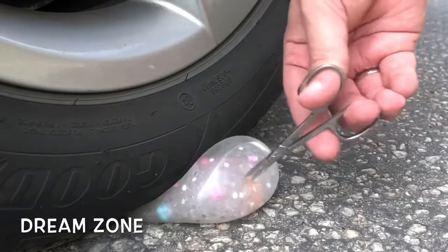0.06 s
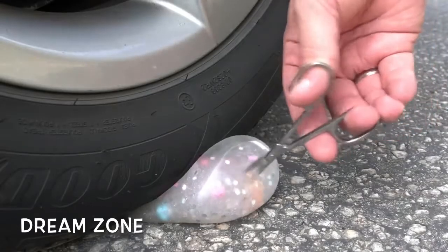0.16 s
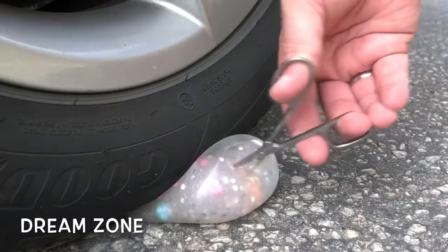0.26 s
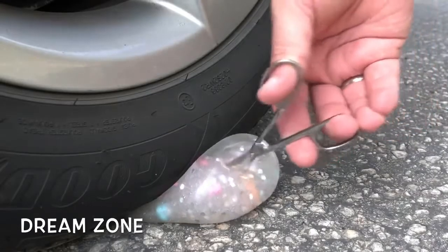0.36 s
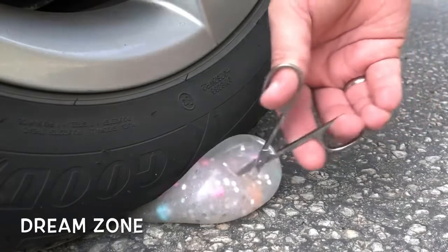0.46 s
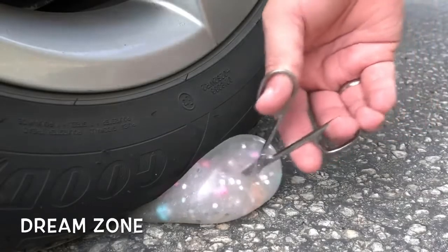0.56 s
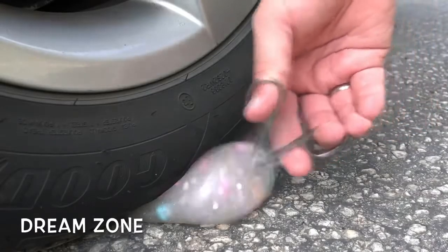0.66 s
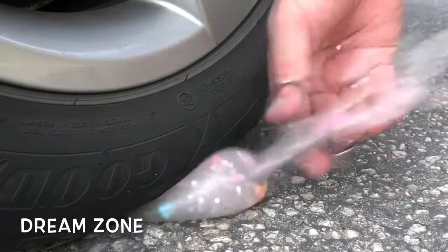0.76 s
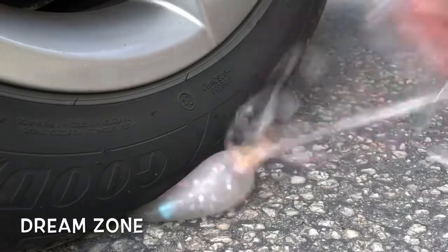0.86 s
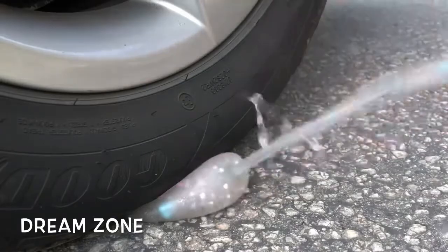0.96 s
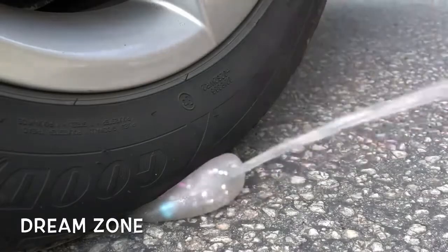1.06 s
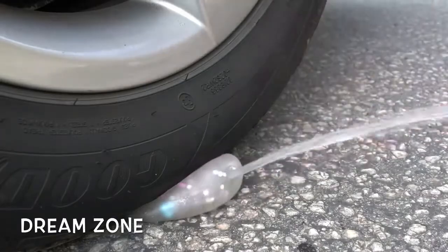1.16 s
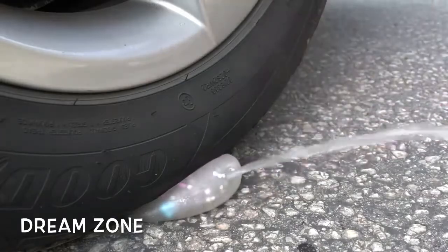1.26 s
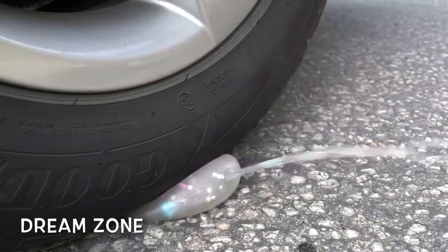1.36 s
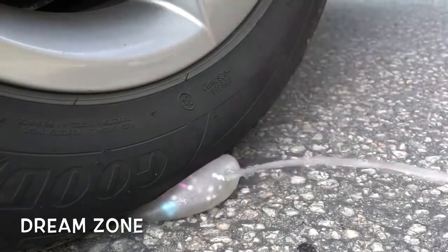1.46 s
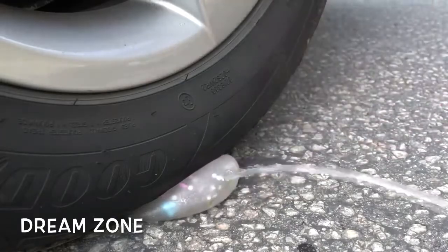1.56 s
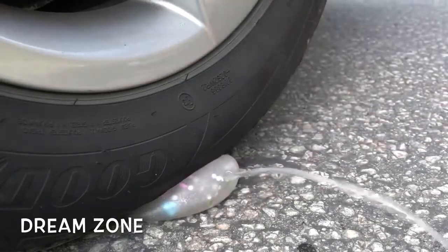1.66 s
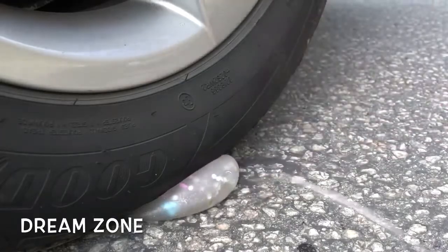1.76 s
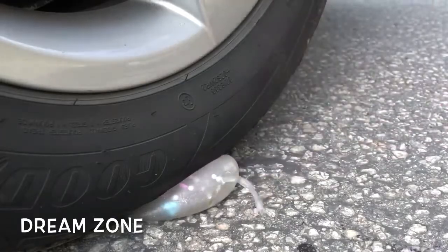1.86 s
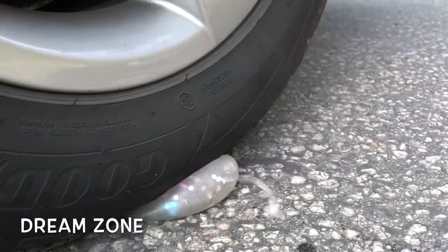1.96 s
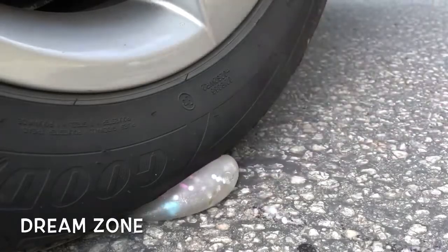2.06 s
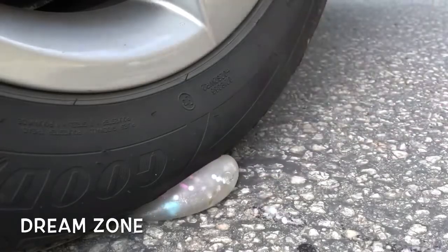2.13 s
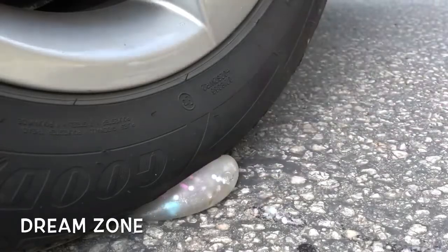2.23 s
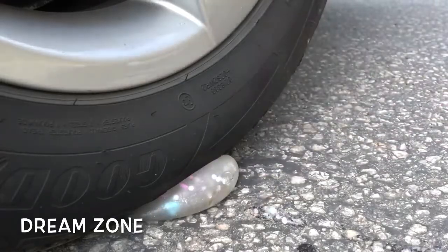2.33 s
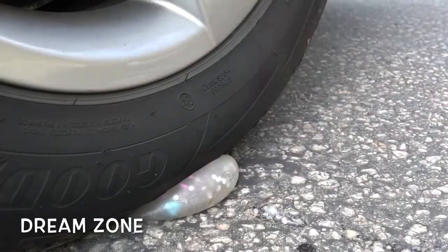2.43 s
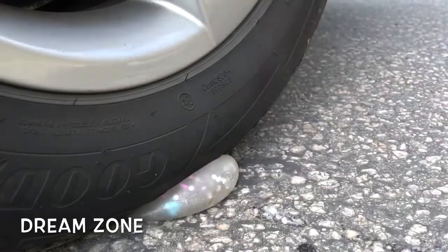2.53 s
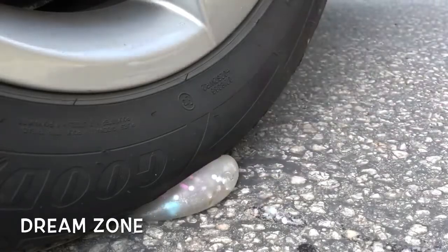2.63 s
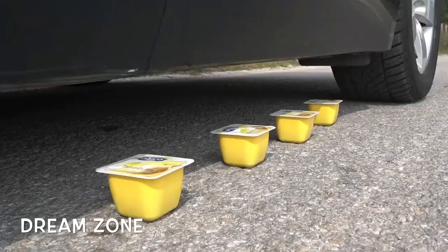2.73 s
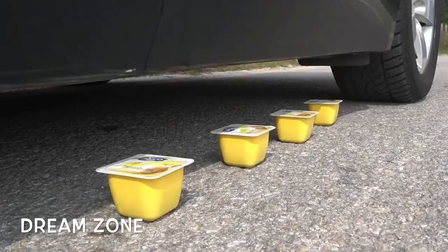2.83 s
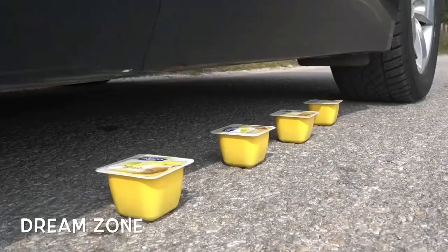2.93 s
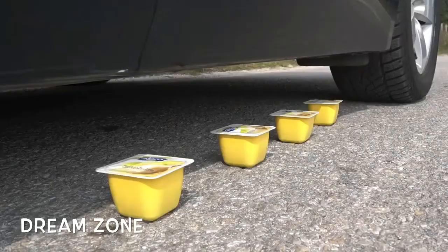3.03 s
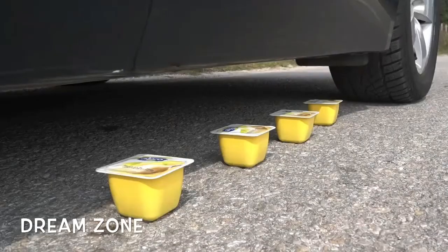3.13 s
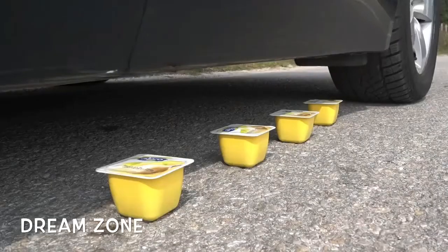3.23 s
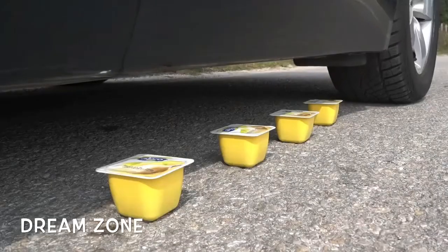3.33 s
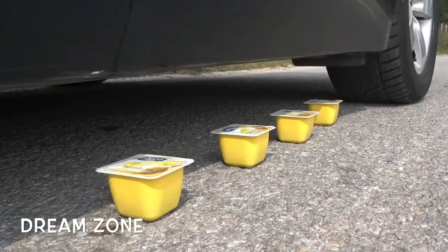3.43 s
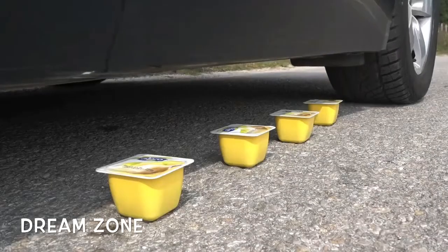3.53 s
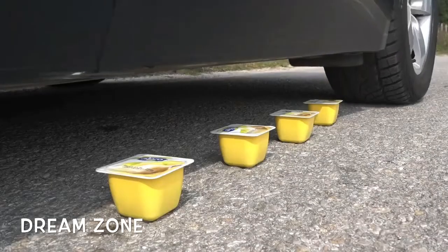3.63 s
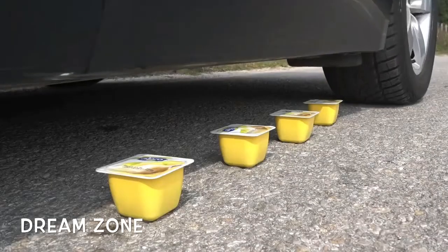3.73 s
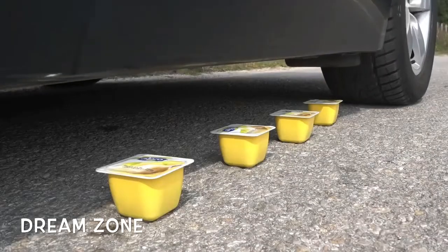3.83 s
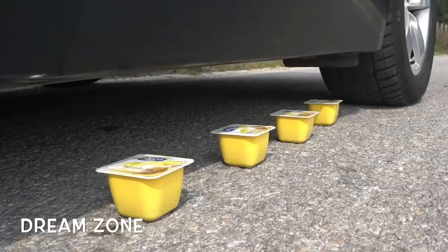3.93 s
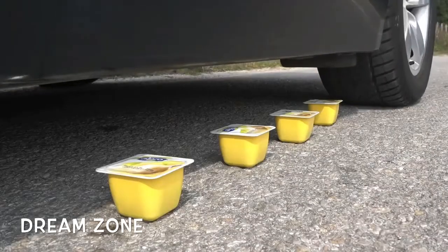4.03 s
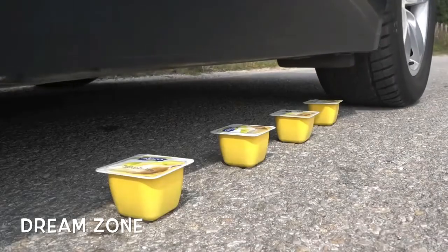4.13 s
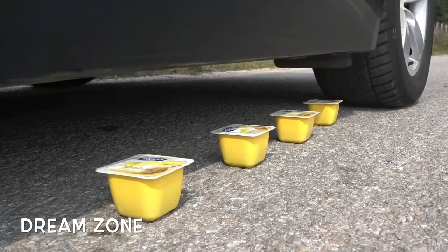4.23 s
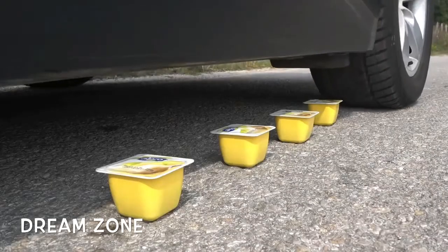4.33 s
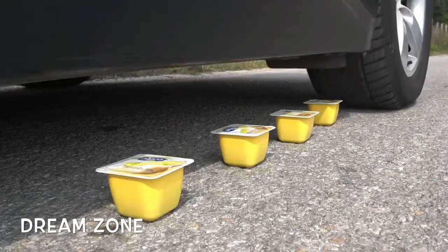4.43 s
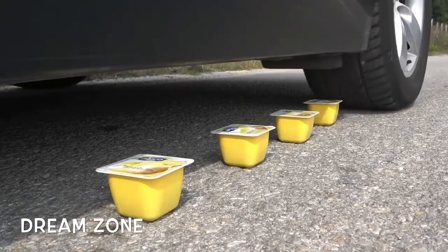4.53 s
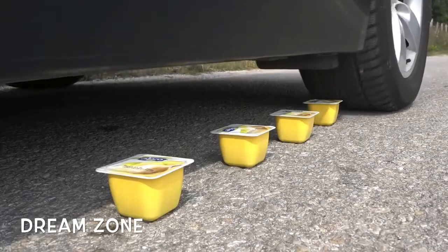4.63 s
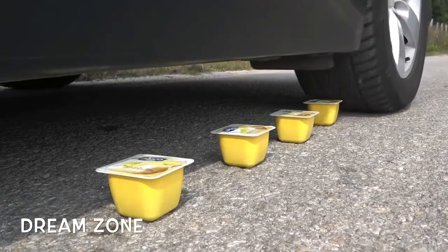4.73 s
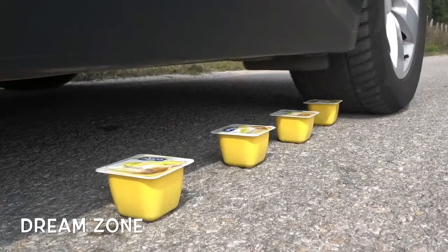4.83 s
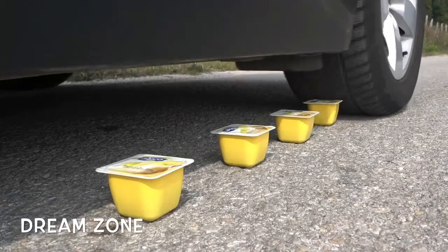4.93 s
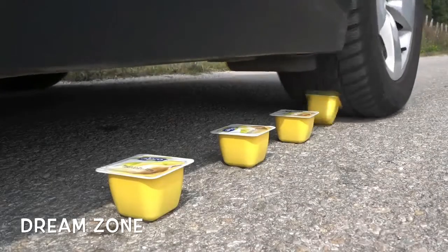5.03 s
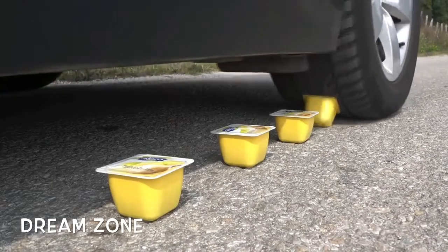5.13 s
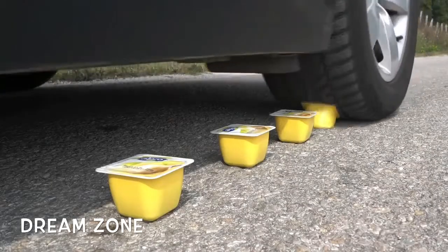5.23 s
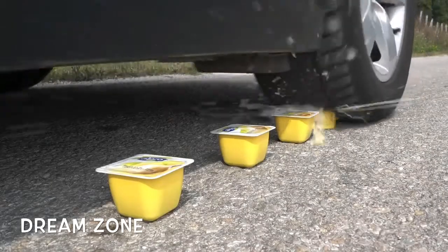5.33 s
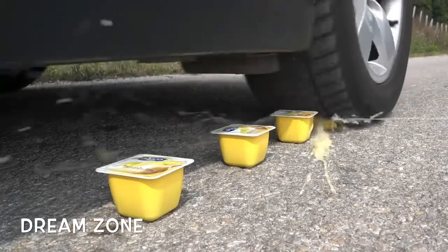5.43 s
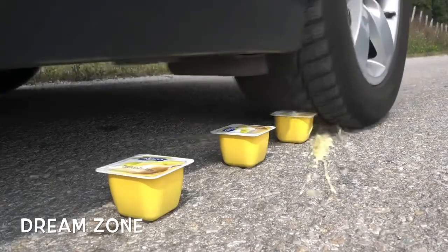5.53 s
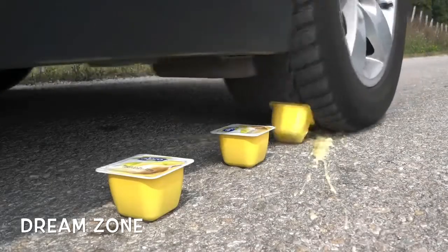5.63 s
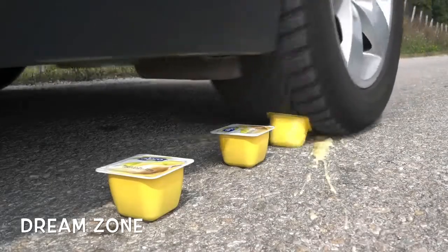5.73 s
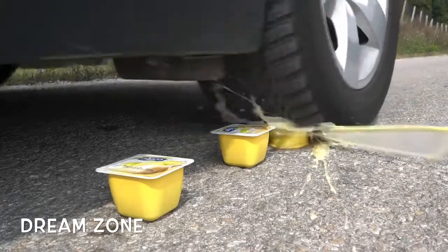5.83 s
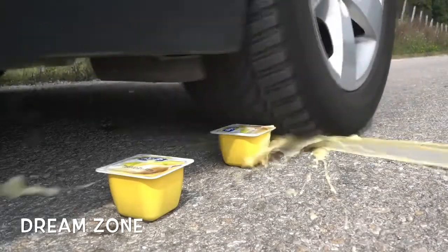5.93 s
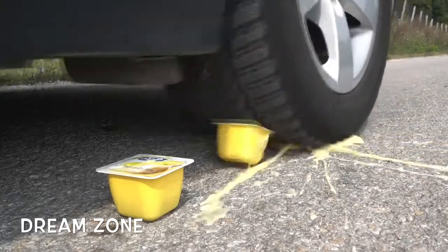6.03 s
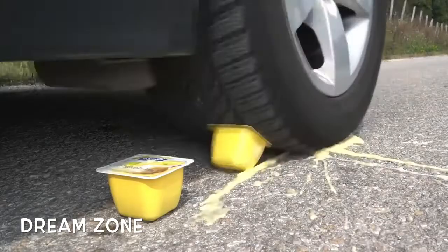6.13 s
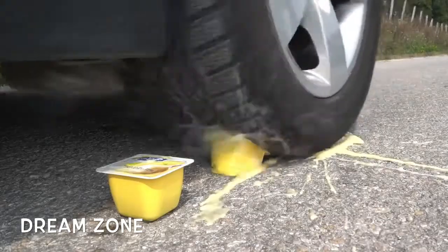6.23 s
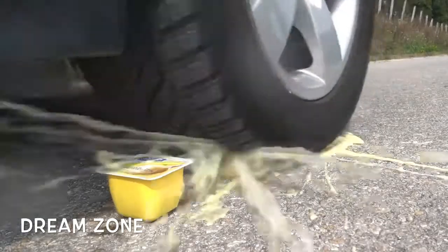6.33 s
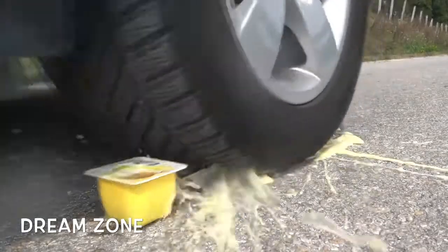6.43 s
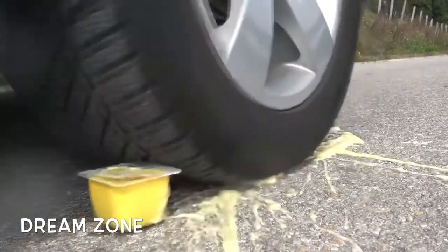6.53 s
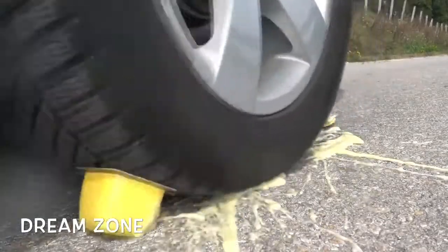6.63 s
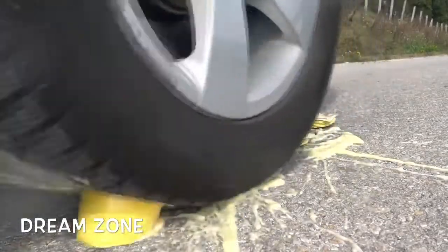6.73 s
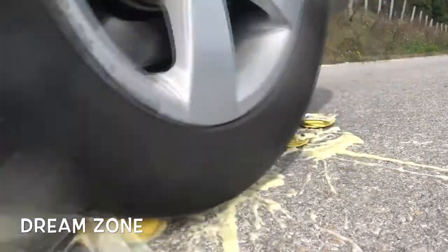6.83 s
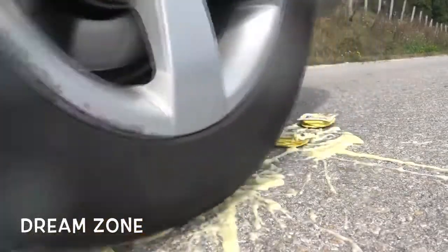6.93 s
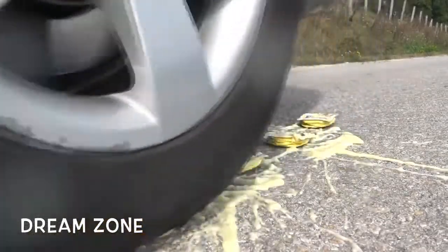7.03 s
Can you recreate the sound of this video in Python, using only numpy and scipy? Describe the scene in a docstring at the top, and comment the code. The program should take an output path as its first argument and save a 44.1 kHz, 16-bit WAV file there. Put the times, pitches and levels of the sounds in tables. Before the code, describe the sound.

A snipped water balloon bursts and spits a fading hissing jet, then a slow tyre crunches grit and crushes four sealed plastic cups with wet, snapping pops.

```python
"""You hear a wet burst and a spitting, fading hiss, then, at another spot, grit crunching and plastic
breaking: a snipped water balloon spits a jet, then a car flattens four sealed cups.
The jet, grit, squirts and open air are shaped noise with small ringing grains; spits, stones and snaps
are clicks that ring; pops are pressure pulses; gulps, groans and bumps are short tones.
An engine idles faintly at the first spot."""
import sys
import numpy as np
from scipy import signal
from scipy.fft import rfft, irfft, next_fast_len
from scipy.io import wavfile

SR = 44100
rng = np.random.default_rng(int(sys.argv[2]) if len(sys.argv) > 2 else 0)


def master(y):
    """Save y as 16-bit WAV."""
    cut = np.clip(np.atleast_2d(y).T, -1, 1)
    pcm = np.round(cut * 32767)  # scale
    wavfile.write(sys.argv[1], SR, pcm.astype(np.int16))


N = 312228   # length in samples

# Open air loudness. Each row: time in seconds, level in dB.
AIR_LEVEL = [(0, -50.5), (1.5, -52), (2.7, -52), (2.71, -54), (7.08, -43)]
# Tone of the open air at each spot. Each row: pitch in Hz, relative strength in dB per Hz.
FIRST_SPOT_TONE = [(20, -31), (50, -2.5), (92, 0.5), (220, -11.5), (320, -20.5), (720, -23), (1200, -28),
                   (2500, -28.5), (11300, -41.5)]
SECOND_SPOT_TONE = [(20, -30), (55, 3.5), (92, -5.5), (220, -3), (900, -11), (3700, -28), (11300, -34.5)]
# How alike left and right are, for near and far sounds. Each row: pitch in Hz, likeness (1 is the same).
NEAR_ALIKE = [(60, 0.95), (220, 1), (840, 0.95), (3140, 0.16), (11700, 0.2)]
FAR_ALIKE = [(60, 1), (170, 0.98), (500, 0.76), (1420, 0.26), (11700, 0.011)]

# Water jet losing pressure. Each row: time in seconds, hiss level in dB.
JET_LEVEL = [(0.607, -28), (0.68, -33), (0.79, -51), (0.83, -34.5), (1.04, -35), (1.4, -44), (1.68, -53.5),
             (1.9, -60), (2.15, -93)]
# The jet surges as the cut tears wider. Each row: start in seconds, hiss level in dB, hold in seconds.
SURGES = [(0.697, -24, 0.017), (0.756, -25.5, .003)]
# Tone of the jet. Each row: pitch in Hz, relative strength in dB per Hz.
JET_TONE = [(300, -32), (800, -13), (1300, -4.5), (2000, -8), (3600, -5.5), (6800, -5.5), (8000, -6.5),
            (11300, -6.5)]
# The cut in the skin sings. Each row: pitch in Hz, level against the hiss in dB.
NOZZLE = [(7200, -15)]
# Spits, drops and scissor ticks. Each row: start in seconds, level in dB, ring in Hz.
SPITS = [(0.508, -29.5, 950), (0.5566, -30.5, 1100), (0.6065, -8, 1290), (0.6415, -15.5, 3300),
         (0.646, -13.5, 1110), (0.6958, -11.5, 3400), (0.7044, -7, 2060), (0.7114, -14, 2670),
         (0.756, -18, 7400), (0.7633, -11, 2720), (0.806, -17, 10500), (0.849, -15, 9900),
         (0.8963, -15.5, 10500), (0.924, -23, 5070), (0.9577, -19.5, 2380), (0.987, -16, 4300),
         (1.0066, -15.5, 3900), (1.0859, -11.5, 3540), (1.0875, -19, 1410), (1.1767, -23.5, 6460),
         (1.24, -27.5, 5440), (1.3144, -24.5, 4770), (1.3457, -23.5, 5700), (1.5272, -23, 5000),
         (1.6646, -36, 6900), (1.108, -30, 900), (1.752, -39.5, 5600), (1.865, -40.5, 6400),
         (2.6766, -41, 3400)]
# A skin, wall or lid letting go at once. Each row: start in seconds, level in dB, suck length in seconds.
POPS = [(.607, -27, .0007), (5.2303, -12, .0013), (5.7484, -14, .0011), (6.1904, -11, .002),
        (6.6795, -10, .0017)]
# Air pockets that close or whistle, a faint hoot and a faint, narrow high hiss.
# Each row: start in seconds, level in dB, start pitch in Hz, end pitch in Hz, length in seconds.
GULPS = [(0.684, -18.5, 1232, 2496, 0.037), (0.765, -34, 2260, 3420, 0.015), (2.118, -50, 513, 583, 0.058),
         (2.354, -65, 10300, 10400, 0.15), (5.309, -26, 2610, 3360, 0.034),
         (5.401, -25.5, 2256, 2310, 0.05), (5.888, -19, 1280, 1400, 0.017), (5.932, -8, 2400, 4400, 0.0045)]

# Tyre creeping over grit. Each row: time in seconds, crunch level in dB, left minus right in dB.
ROLL = [(2.71, -75, 9), (3.5, -60, 12), (4.4, -47, 4), (4.95, -45.5, 5)]
# Tone of the grit. Each row: pitch in Hz, relative strength in dB per Hz.
GRIT_TONE = [(150, -13.5), (300, -15), (800, 1), (1100, -7.5), (3000, -14), (4800, -33), (9000, -40.5)]
# Stones giving way. Each row: start in seconds, level in dB, ring in Hz.
STONES = [(3.131, -41.5, 2280), (3.179, -42.5, 1960), (3.256, -36.5, 840), (3.296, -41.5, 950),
          (3.502, -43, 890), (3.61, -37, 750), (3.636, -30, 860), (3.728, -38.5, 895), (3.794, -43, 970),
          (3.949, -37.5, 940), (4.063, -36, 755), (4.195, -38, 1270), (4.408, -31, 780), (4.446, -27, 800),
          (4.558, -37.5, 800), (4.745, -35, 1220), (4.809, -34, 690), (4.845, -39, 690),
          (4.898, -33.5, 1450)]
# Dull bumps as the car rocks forward. Each row: centre in seconds, level in dB.
BUMPS = [(3.51, -42), (4.575, -46.5), (4.89, -54)]

# A wall or pebble bends into a sliding note. Each row: peak in seconds, level in dB, pitch at the peak in Hz.
GROANS = [(4.624, -29.5, 284), (4.953, -23.5, 414), (4.989, -19, 490), (5.0376, -23, 483),
          (5.094, -22, 720), (5.259, -18, 392), (5.522, -22.5, 476), (5.592, -27.5, 575), (5.789, -13, 205),
          (5.823, -27, 128), (5.9873, -18, 460), (6.053, -21.5, 430), (6.539, -18, 460), (6.567, -21, 507),
          (6.633, -19, 223), (6.668, -21, 870)]
# Plastic snapping. Each row: start in seconds, level in dB, ring in Hz, noise fall by 60 dB in seconds.
SNAPS = [(4.987, -19.5, 2300, 0.03), (5.345, -11, 790, 0.013), (5.684, -13, 1040, 0.051),
         (6.312, -10, 785, 0.0093), (6.848, -20, 1230, 0.018), (5.074, -18.5, 1740, 0.023),
         (5.092, -15, 3940, 0.015), (5.1525, -12.5, 1220, 0.011), (5.23, -10, 3960, 0.23),
         (5.47, -13.5, 8800, 0.011), (5.4867, -4.5, 10100, 0.0074), (5.533, -8, 5140, 0.032),
         (5.55, -3, 4830, 0.005), (5.559, -5.5, 4640, 0.0042), (5.595, -4.5, 4200, 0.0093),
         (5.635, -9.5, 2520, 0.011), (5.672, -7, 7150, 0.014), (5.7496, -9, 2390, 0.0098),
         (5.8384, -12, 2350, 0.056), (5.8887, 1, 1410, 0.012), (6.365, -10, 2170, 0.025),
         (6.069, -13.5, 1410, 0.031), (6.091, -14, 3000, .01), (6.107, -17, 2800, 0.034),
         (6.1905, -9.5, 3060, 0.15), (6.456, -13.5, 1970, 0.014), (6.489, -20.5, 2000, 0.038),
         (6.6267, -10, 1110, 0.039), (6.681, -10.5, 8000, 0.083), (6.8123, -5, 7540, 0.011),
         (6.864, -8, 7900, 0.0045)]
# Ways a cup wall shakes. Each row: pitch in Hz, base width in Hz, relative level in dB.
WALL_MODES = [(234.5, 17, 0.5), (460, 148, 3), (720, 99, -0.5)]
# A wall folds under the tread. Each row: peak in seconds, creak level in dB, thud level in dB.
FOLDS = [(4.992, -22, -55), (5.086, -21.5, -48), (5.151, -27.5, -35), (5.267, -21.5, -33),
         (5.495, -44, -29.5), (5.522, -30.5, -30), (5.582, -28.5, -43), (5.638, -29.5, -32.5),
         (5.81, -42, -23.5), (5.981, -28.5, -37), (6.066, -24.5, -29.5), (6.124, -24.5, -32),
         (6.33, -24.5, -43), (6.46, -52, -32.5), (6.511, -27.5, -45), (6.547, -24.5, -31),
         (6.631, -24.5, -28)]
# Filling or air squeezed out before and between bursts.
# Each row: peak in seconds, squirt level in dB, spray level in dB.
OOZES = [(4.984, -38, -52), (5.084, -29.5, -38.5), (5.5, -45, -29.5), (5.585, -31.5, -34.5),
         (5.65, -31.5, -46), (5.911, -26.5, -42), (5.985, -33, -33), (6.071, -25.5, -33.5),
         (6.552, -31.5, -39), (6.646, -27, -56)]
# A cup bursts. Each row: start in seconds, first blast in dB, stream in dB, stream delay in seconds,
# stream length in seconds, squirt against spray in dB, wall creak in dB, thud in dB.
BURSTS = [(5.23, -14, -23.5, 0.1, 0.082, -11, -23.5, -24.5), (5.748, -16, -31.5, .04, 0.055, 1, -29, -34),
          (6.1898, -13.5, -18.5, 0.09, 0.092, -6.5, -37, -27.5),
          (6.678, -18, -23.5, 0.014, 0.17, -4.5, -30, -28)]
# The wheel rolls on through the mess. One row: thud, creak, squirt and spray levels in dB.
ROLL_ON_DB = (-41.5, -55.5, -39.5, -55)
# Tones of the thud, squirt and spray. Each row: pitch in Hz, relative strength in dB per Hz.
THUD_TONE = [(30, -26), (60, 2.5), (230, 2), (330, -14.5), (600, -33)]
SQUIRT_TONE = [(500, 3), (1000, -2), (2200, -0.5), (4000, -8.5), (8000, -17.5)]
SPRAY_TONE = [(1500, -10.5), (3200, -2), (9200, -2.5), (11300, -7)]
# The wheel ends up to the left as it nears. Each row: time in seconds, left minus right in dB.
CUPS_PAN = [(0, 0), (6.2, -0.55), (7.08, 3.5)]

SPOT_CHANGE_S = 2.705
IDLE_FIRST_S, IDLE_PER_S, IDLE_T60_S = .003, 25.3, .03
IDLE_DB, IDLE_HZ = -17, 750   # level against the open air
SURGE_RISE_DB_PER_S, SURGE_FALL_DB_PER_S = 900.5, 453
RECOIL_LONGER = 4.8   # the push lasts this many times the suck
STONE_CYCLES = 64   # the noise in a stone's crack falls 60 dB in this many cycles of its ring
BUMP_HZ, BUMP_S = 65.6, 0.02
GROAN_SWELL_S, GROAN_DIE_S, GROAN_SLIDE_PER_S = 0.008, 0.0057, 4.2   # slide: share of the pitch per second
FOLD_RISE_DB_PER_S, FOLD_FALL_DB_PER_S = 390, 256
OOZE_RISE_DB_PER_S, OOZE_FALL_DB_PER_S = 288, 280
BLAST_RISE_DB_PER_S, BLAST_FALL_DB_PER_S = 25000, 257
STREAM_RISE_DB_PER_S, STREAM_FALL_DB_PER_S, SQUIRT_FALL_DB_PER_S = 194, 500, 136
DRIBBLE_DB, DRIBBLE_FALL_DB_PER_S = -9, 106   # left after the stream stops, against the stream
WALL_FALL_DB_PER_S, THUD_FALL_DB_PER_S = 187, 102
SEALED_S = .12   # no stream this long ahead of a burst
ROLL_ON_S = 5.0
LAST_DRIP_S, LAST_DRIP_DB = 6.9, -42   # the last cup keeps dribbling
CUTOFF_HZ = 11300


def amp(db):
    """Turn dB into a plain multiplier."""
    return 10 ** (np.asarray(db) / 20)


def rms_one(x):
    """Scale to an average strength (rms) of 1."""
    return x / np.sqrt(np.mean(x ** 2) + 1e-20)


def in_time(rows, silent_db=-120):
    """Read a table's columns at every sample; the first is silent outside the table's times."""
    s, *columns = np.transpose(rows)
    t, s = np.arange(N) / SR, np.maximum.accumulate(s)
    first = np.interp(t, s, columns[0], left=silent_db, right=silent_db)
    return [first] + [np.interp(t, s, column) for column in columns[1:]]


def at_hz(points, hz):
    """Read a tone table with pitch spaced in octaves."""
    table_hz, values = np.array(points)[:, 0], np.array(points)[:, 1]
    return np.interp(np.log(hz), np.log(table_hz), values)


def drift(rate_hz):
    """Random wandering of spread 1: noise smoothed twice above rate_hz, made at every 20th sample."""
    r = np.exp(-40 * np.pi * rate_hz / SR)
    noise = rng.standard_normal(N // 20 + 2002)
    slow = signal.lfilter([1], [1, -2 * r, r * r], noise)[2000:]   # skip the settling
    return np.interp(np.arange(N) / 20, np.arange(len(slow)), rms_one(slow))


def resonance(x, hz, width_hz):
    """Ring at one pitch, as a two-pole band-pass with a gain of 1 at the top."""
    r = np.exp(-np.pi * width_hz / SR)
    ring = [1, -2 * r * np.cos(2 * np.pi * hz / SR), r * r]
    return signal.lfilter([(1 - r * r) / 2, 0, (r * r - 1) / 2], ring, x)


def panned(pan_db):
    """Left and right gains for a left-minus-right difference in dB."""
    return amp(np.array([pan_db / 2, -pan_db / 2]))


def grains(per_s, spread_db, t60):
    """Envelope of random bursts that start at once and fall 60 dB in t60 seconds; rms 1."""
    sizes = amp(spread_db * np.minimum(rng.exponential(1, N), 4))
    born = rng.random(N) < per_s / SR
    return rms_one(signal.lfilter([1], [1, -amp(-60 / (t60 * SR))], sizes * born + 1e-18))


def pings(per_s, low_hz, high_hz, sharpness):
    """Small bubbles or pebbles ring briefly at scattered times, pitches and places; rms 1."""
    born = rng.random(N) < per_s / SR
    sized = born * amp(3.74 * np.minimum(rng.exponential(1, N), 4))
    dealt, places_db = rng.integers(0, 16, N), rng.normal(0, 4.0, 16)
    out = np.zeros((2, N))
    for k, (hz, pan_db) in enumerate(zip(np.geomspace(low_hz, high_hz, 16), places_db)):
        clicks = sized * (dealt == k) + 1e-18
        ring = resonance(resonance(clicks, hz, hz / sharpness), hz, hz)
        out += panned(pan_db)[:, None] * ring
    return rms_one(out)


def coloured(spectrum, alike, patchy_db, envelope=1):
    """Stereo noise under an envelope, shaped by a tone table and flickering band by band; rms 1."""
    size = next_fast_len(N)
    hz = np.maximum(np.arange(size // 2 + 1) * SR / size, 10)
    mid, side = rfft(rng.standard_normal((2, N)) * envelope, size) * amp(at_hz(spectrum, hz))
    like = np.clip(at_hz(alike, hz), -1, 1)
    both = np.sqrt(1 + like) * mid + np.sqrt(1 - like) * side * [[1], [-1]]
    odd = np.cos(np.pi * np.log2(hz)) ** 2   # two interleaved sets of bands waver separately
    out = 0
    for part in (odd, 1 - odd):
        out = out + irfft(both * part, size)[:, :N] * amp(patchy_db * drift(21.0))
    return rms_one(out)


def cracks(events, t60s, pan_db, sharp, broad, wide, click=2.7):
    """Each event is a click and a dying noise that ring one pitch, with a broad crack on top."""
    out, size = np.zeros((2, N + 4096)), 4096
    noise = rng.standard_normal((len(events), 2, size))
    for (s, db, hz, *_), t60, (mid, side) in zip(events, t60s, noise):
        fall = amp(-60 * np.arange(size) / SR / max(t60, .002))
        side = signal.lfilter([.5, -.5], [1], side)   # left and right differ most in the treble
        burst = fall * (mid + wide * side * [[1], [-1]])
        burst[:, 0] += click
        hz = min(hz, 10500)
        ring = resonance(resonance(burst, hz, hz / sharp), hz, 2 * hz)
        sound = ring + broad * np.diff(burst * fall, prepend=0)
        at = round(s * SR)
        out[:, at:at + size] += amp(db) * sound / np.abs(sound.mean(axis=0)).max()
    return panned(pan_db)[:, None] * out[:, :N]


def swells(s, db, rise, fall, hold=0):
    """Levels in dB that rise to each peak, hold and fall at steady rates; the loudest counts."""
    t = np.arange(0, N, 16) / SR   # every 16th sample is enough
    s, db, hold = (np.reshape(v, (-1, 1)) for v in (s, db, hold))
    level = db - rise * np.maximum(s - t, 0) - fall * np.maximum(t - s - hold, 0)
    return np.interp(np.arange(N) / SR, t, np.maximum(level.max(axis=0), -120))


def air():
    """Distant rumble and hiss of the open road: shaped noise, with a different tone at each spot."""
    first = coloured(FIRST_SPOT_TONE, FAR_ALIKE, 2.4)
    second = coloured(SECOND_SPOT_TONE, FAR_ALIKE, 0.78)
    return amp(in_time(AIR_LEVEL)[0]) * np.where(np.arange(N) < SPOT_CHANGE_S * SR, first, second)


def idle():
    """The engine ticks at the first spot: each firing gives a short puff of noise ringing one pitch."""
    t = np.arange(N) / SR
    since_firing = (t - IDLE_FIRST_S) % (1 / IDLE_PER_S)
    puffs = rng.standard_normal((2, N)) * amp(-60 * since_firing / IDLE_T60_S)
    ticks = resonance(puffs, IDLE_HZ, 170)
    blended = rms_one(ticks + ticks[::-1] / 2)   # some of each side leaks into the other
    return amp(IDLE_DB + in_time(AIR_LEVEL)[0]) * blended * (t < SPOT_CHANGE_S)


def balloon():
    """The jet breaks into spits and bubbles over a hiss that sings in the cut and fades with pressure."""
    s, db, hold = np.transpose(SURGES)
    surge_db = swells(s, db, SURGE_RISE_DB_PER_S, SURGE_FALL_DB_PER_S, hold)
    hiss_db = np.maximum(in_time(JET_LEVEL)[0], surge_db)
    hiss = coloured(JET_TONE, NEAR_ALIKE, 2, .6 + grains(150, 4, .01))
    sung = sum(amp(db) * rms_one(resonance(hiss, hz, 685)) for hz, db in NOZZLE)
    jet = hiss + sung + .4 * pings(900, 1500, 9000, 10)
    spits = cracks(SPITS, np.full(len(SPITS), .02), -1.3, sharp=3.0, broad=0.13, wide=0.76)
    return amp(hiss_db) * jet + spits


def pops():
    """Each release is one short suck of pressure, then a longer, weaker push that makes up for it."""
    out = np.zeros(N)
    for s, db, width in POPS:
        suck, push = np.hanning(round(width * SR)), np.hanning(round(RECOIL_LONGER * width * SR))
        pulse = np.concatenate([-suck, push / RECOIL_LONGER])
        out[round(s * SR):round(s * SR) + len(pulse)] += amp(db) * pulse
    return out


def gulps():
    """Each short tone rises in a wobbling pitch, throbs unevenly and fades to its end."""
    out, wobble, rough = np.zeros(N), drift(180), drift(500)
    for s, db, start_hz, end_hz, length in GULPS:
        u = np.linspace(0, 1, round(length * SR))   # 0 at the start, 1 at the end
        here = slice(round(s * SR), round(s * SR) + len(u))
        pitch = start_hz * (end_hz / start_hz) ** u * (1 + 0.037 * wobble[here])
        note = np.sin(2 * np.pi * np.cumsum(pitch) / SR)
        throb = 1 + .5 * np.cos(2 * np.pi * 135 * length * u) + 0.71 * rough[here]   # 135 Hz throb
        out[here] += amp(db) * note * throb * np.minimum(u * 30, 1) * (1 - u) ** 0.59
    return out


def tyre():
    """Grit crunches in clumps under the slow tyre, as bursts of noise and pings, while stones crack."""
    crunch_db, pan_db = in_time(ROLL)
    grit = coloured(GRIT_TONE, FAR_ALIKE, 1, .4 + grains(60, 3, .045))
    grit = grit + .4 * pings(250, 500, 1500, 6.0)
    stone_t60s = STONE_CYCLES / np.array(STONES)[:, 2]
    stones = cracks(STONES, stone_t60s, 5.4, sharp=3.2, broad=0.01, wide=0.87, click=2.5)
    return amp(crunch_db) * panned(pan_db) * grit + stones


def bumps():
    """The rocking car gives a few low cycles that swell and fade."""
    t = np.arange(N) / SR
    out = np.zeros(N)
    for s, db in BUMPS:
        swell = np.exp(-((t - s) / BUMP_S) ** 2)
        out += amp(db) * swell * np.sin(2 * np.pi * BUMP_HZ * (t - s))
    return out


def groans():
    """Each note swells while the load builds, slides upward and dies fast when the wall gives."""
    out, t, rough = np.zeros((2, N)), np.arange(-2000, 1500) / SR, drift(120)   # t is 0 at the peak
    for (s, db, hz), (start, place) in zip(GROANS, rng.random((len(GROANS), 2))):
        here = slice(round(s * SR) - 2000, round(s * SR) + 1500)
        swell = np.exp(np.minimum(t / GROAN_SWELL_S, -t / GROAN_DIE_S))
        shape = amp(db + 2.5 * rough[here]) * swell
        turns = start + hz * (t + GROAN_SLIDE_PER_S * t ** 2 / 2)
        note = np.sin(2 * np.pi * turns)
        out[:, here] += panned(2.6 * (place - .5))[:, None] * shape * note
    return out


def before(s):
    """True just ahead of each burst, while the lid is still sealed."""
    t = np.arange(N) / SR
    return sum((t < at) & (t > at - SEALED_S) for at in s)


def crushing():
    """Levels of thud, creak, squirt and spray: folds and oozes, then blast, stream and dribble of each burst."""
    s, blast, stream, later, length, below, wall, thump = np.transpose(BURSTS)
    fold_s, fold, fold_thump = np.transpose(FOLDS)
    ooze_s, ooze, mist = np.transpose(OOZES)
    shut = -120 * before(s)   # silences the stream while sealed
    # each level starts from the wheel rolling on, which rises once and stays
    thud, creak, squirt, spray = (swells(ROLL_ON_S, db, FOLD_RISE_DB_PER_S, 0) for db in ROLL_ON_DB)
    thud = [thud, swells(s, thump, BLAST_RISE_DB_PER_S, THUD_FALL_DB_PER_S),
            swells(fold_s, fold_thump, FOLD_RISE_DB_PER_S, FOLD_FALL_DB_PER_S)]
    creak = [creak, swells(s, wall, BLAST_RISE_DB_PER_S, WALL_FALL_DB_PER_S),
             swells(fold_s, fold, FOLD_RISE_DB_PER_S, FOLD_FALL_DB_PER_S)]
    squirt = [squirt, swells(s, blast + below, BLAST_RISE_DB_PER_S, BLAST_FALL_DB_PER_S),
              swells(s + later, stream + below, STREAM_RISE_DB_PER_S, SQUIRT_FALL_DB_PER_S, length) + shut,
              swells(ooze_s, ooze, OOZE_RISE_DB_PER_S, OOZE_FALL_DB_PER_S)]
    spray = [spray, swells(s, blast, BLAST_RISE_DB_PER_S, BLAST_FALL_DB_PER_S),
             swells(s + later, stream, STREAM_RISE_DB_PER_S, STREAM_FALL_DB_PER_S, length) + shut,
             swells(s + later + length, stream + DRIBBLE_DB, BLAST_RISE_DB_PER_S, DRIBBLE_FALL_DB_PER_S),
             swells(ooze_s, mist, OOZE_RISE_DB_PER_S, OOZE_FALL_DB_PER_S),
             swells(LAST_DRIP_S, LAST_DRIP_DB, BLAST_RISE_DB_PER_S, 0)]
    return [np.max(parts, axis=0) for parts in (thud, creak, squirt, spray)]


def cups():
    """Walls slip, ring and snap, the tyre thuds, and the filling squirts and sprays as noise and bubbles."""
    thud_db, creak_db, squirt_db, spray_db = crushing()
    slips = coloured([(100, 0), (1000, 0)], NEAR_ALIKE, .5, 1.8 + grains(220, 2.5, .01))
    creak = 0
    for hz, width, db in WALL_MODES:
        ring = resonance(resonance(slips, hz, 2 * width), hz, 2 * width)
        creak = creak + amp(db + 2 * drift(15.0)) * ring
    creak = rms_one(creak)
    flow = np.clip((spray_db + 43.5) / 10, 0, 1)   # a strong stream is smooth, a weak one breaks into lumps
    splutter = .45 + .3 * flow + (.5 - .25 * flow) * grains(800, 3.5, .0035)
    squirt = coloured(SQUIRT_TONE, NEAR_ALIKE, 6.1) + .65 * pings(700, 954, 4290, 27)
    spray = coloured(SPRAY_TONE, NEAR_ALIKE, 3.7) + .45 * pings(1200, 2500, 10550, 60)
    wet = splutter * (amp(squirt_db) * squirt + amp(spray_db) * spray)
    thud = amp(thud_db) * coloured(THUD_TONE, NEAR_ALIKE, 0.72)
    snaps = cracks(SNAPS, np.array(SNAPS)[:, 3], -1.2, sharp=2.77, broad=0.07, wide=1.5, click=5.9)
    return thud + amp(creak_db) * creak + wet + snaps


def scene():
    """Add up all sources; cups, pops and groans share one left-right position curve."""
    s, pan_db = np.transpose(CUPS_PAN)
    position = panned(np.interp(np.arange(N) / SR, s, pan_db))
    first_spot = air() + idle() + balloon()   # the air goes on at the second spot
    car = tyre() + bumps()
    return first_spot + gulps() + car + position * (pops() + groans() + cups())


def record(dry):
    """Round off the peaks, then cut the treble with a steep edge and again higher up."""
    edge = signal.cheby2(18, 36, CUTOFF_HZ, fs=SR, output="sos")   # at least 36 dB down from here up
    upper = signal.cheby2(8, 50, 14000, fs=SR, output="sos")   # another 50 dB from 14 kHz up
    rounded = .9 * np.tanh(dry / .9)
    return signal.sosfilt(np.vstack([edge, upper]), rounded)


dry = scene()
out = record(dry)
master(out)
```